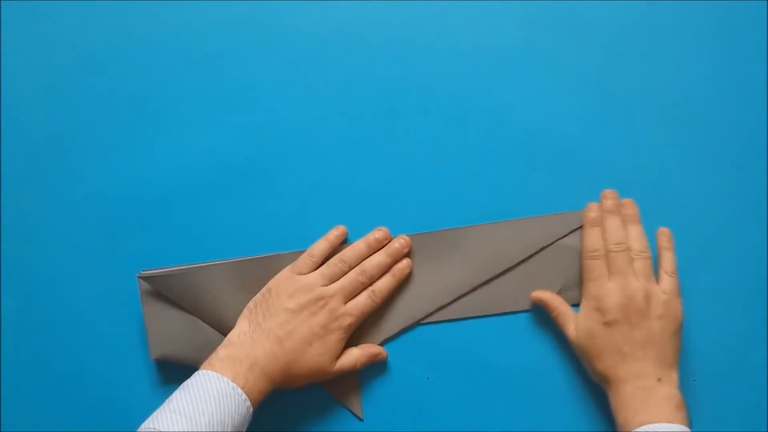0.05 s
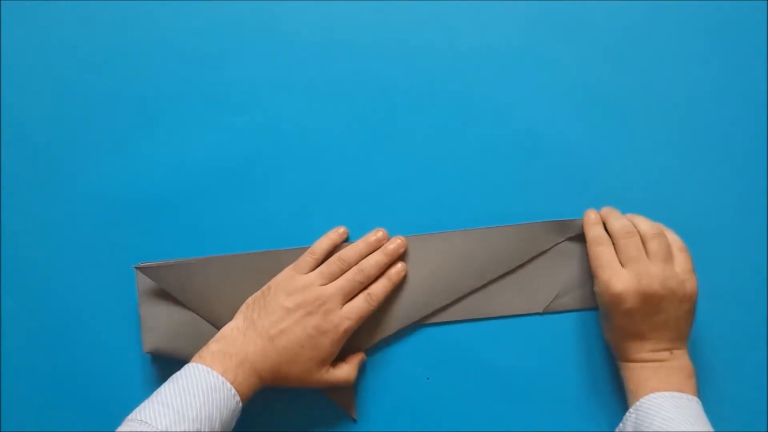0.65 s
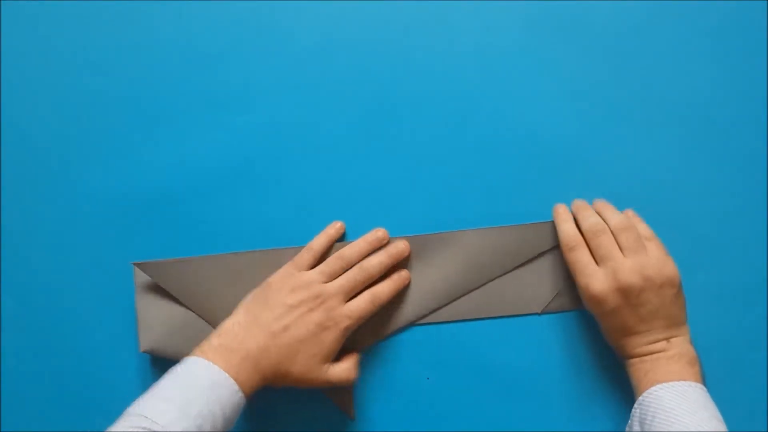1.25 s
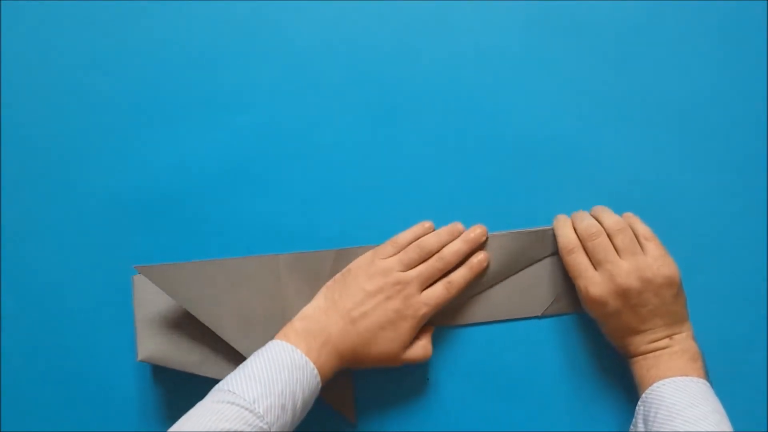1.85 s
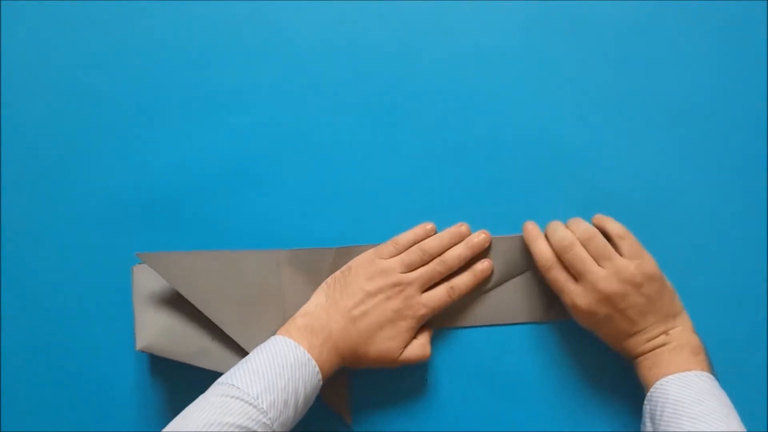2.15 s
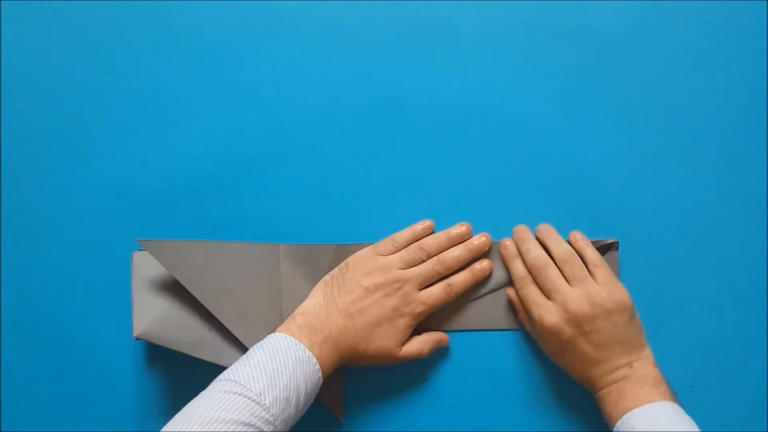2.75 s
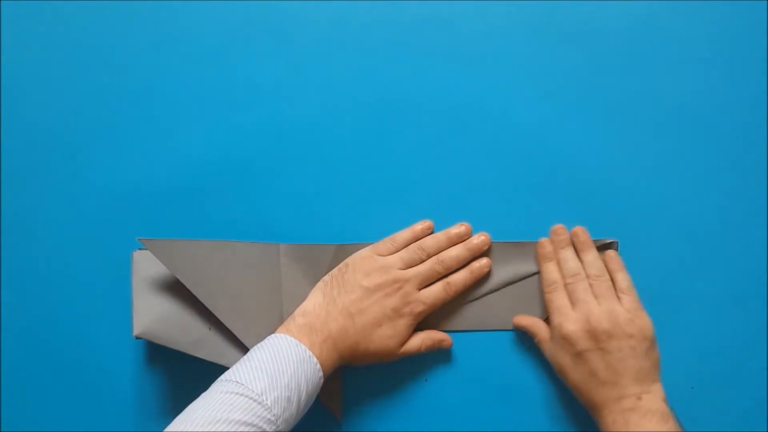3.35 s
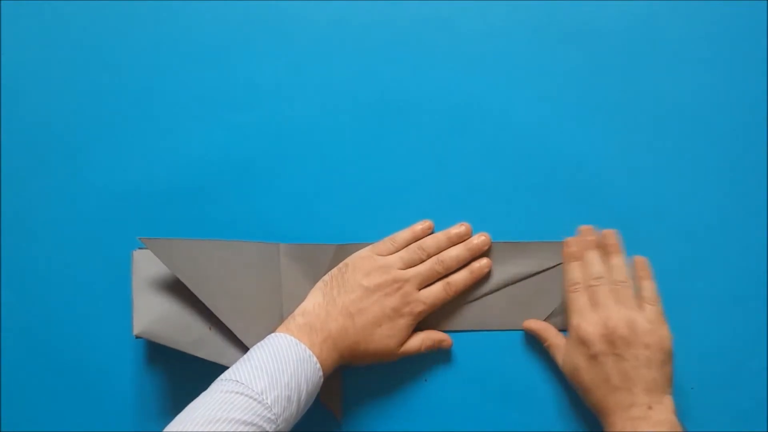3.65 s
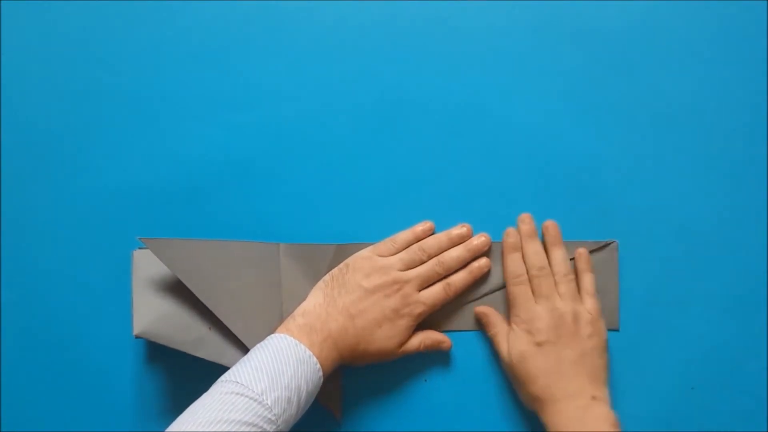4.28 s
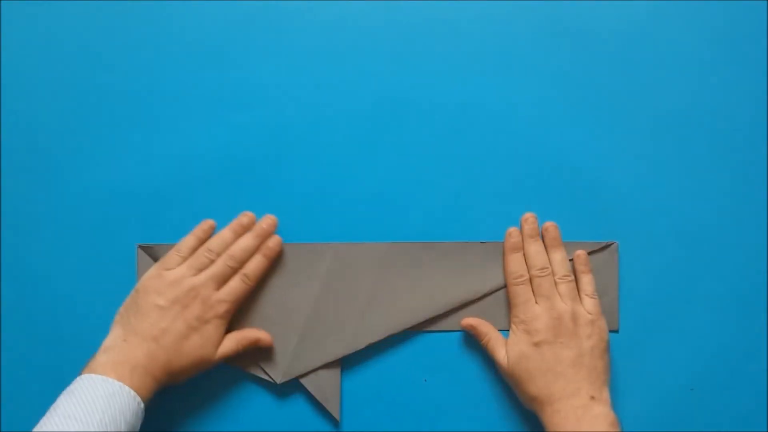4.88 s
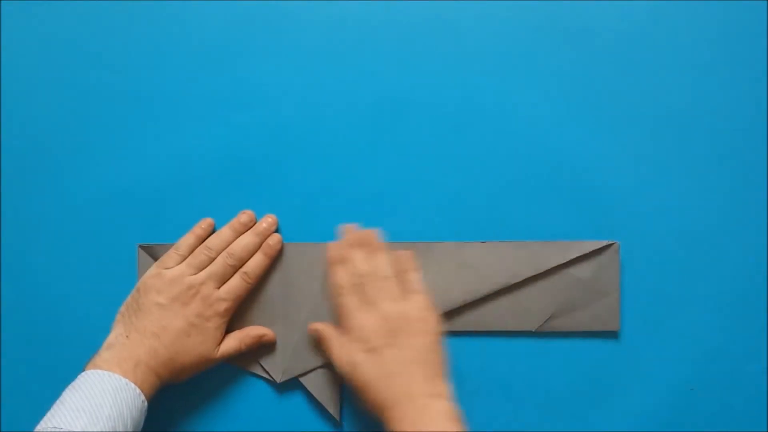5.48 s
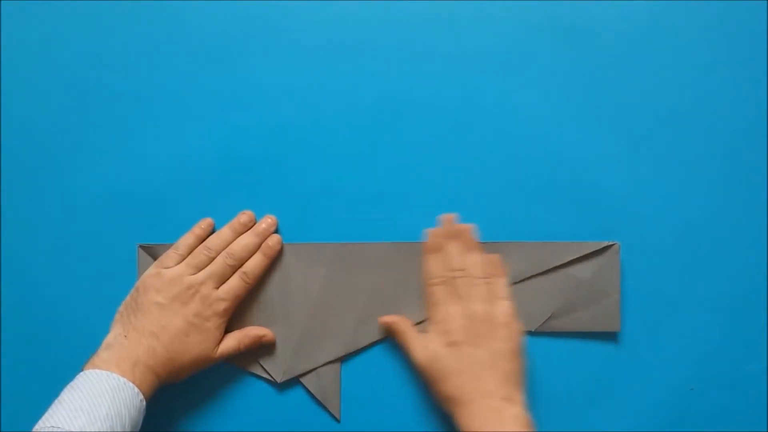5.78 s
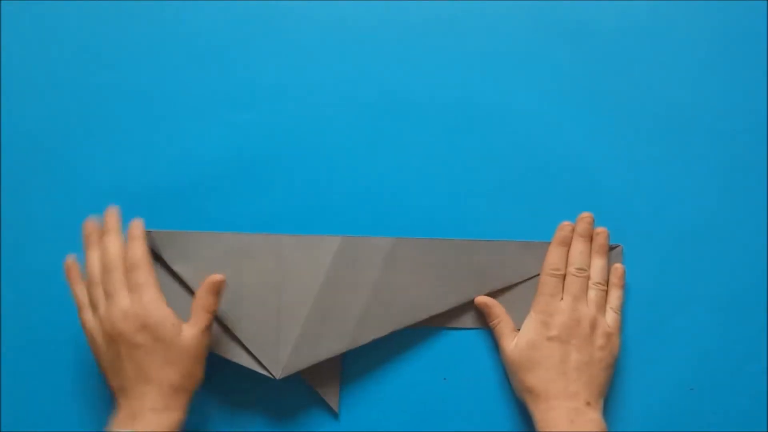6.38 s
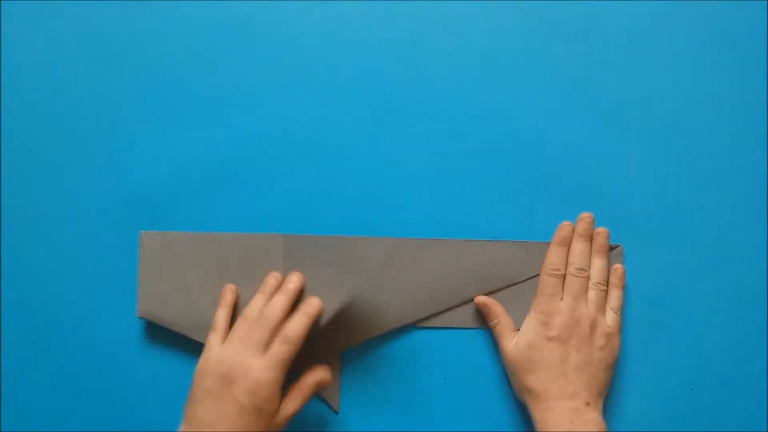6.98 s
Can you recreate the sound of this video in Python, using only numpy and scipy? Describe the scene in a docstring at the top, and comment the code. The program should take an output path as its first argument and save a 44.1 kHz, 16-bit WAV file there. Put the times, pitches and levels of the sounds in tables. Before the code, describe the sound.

Close, dry swishes of palms creasing thick paper on a table, dotted with light crinkles, taps and one sharp snap.

```python
"""Creasing heavy paper

Two hands crease a folded sheet on a tabletop in a small room. Sliding skin hisses, the sheet
rustles and the table rumbles. Folds snap and buckle, a hard-pressed fingertip judders in stick
and slip, edges catch, and one long stroke squeezes a hollow-sounding air pocket between the layers."""
import sys
import numpy as np
from scipy import signal
from scipy.fft import rfft, irfft, next_fast_len
from scipy.io import wavfile

SR = 44100
rng = np.random.default_rng(int(sys.argv[2]) if len(sys.argv) > 2 else 0)


def unload_wav(signal):
    """Save mono or channel-first audio to the path in sys.argv[1] as 16-bit WAV at rate SR, clipped to [-1, 1]."""
    wavfile.write(
        sys.argv[1],
        SR,
        np.round(np.clip(np.atleast_2d(signal).T, -1, 1) * 32767).astype(np.int16),
    )


N = 310081
TIME = np.arange(N) / SR


def from_db(db):
    """Decibels to gain."""
    return 10 ** (np.asarray(db) / 20)


def rms_one(x):
    """Scale to unit rms."""
    return x / np.sqrt(np.mean(x ** 2) + 1e-20)


def at_hz(points, hz):
    """Read a table on a log-frequency axis."""
    points_hz, value = np.transpose(points)
    return np.interp(np.log(np.maximum(hz, 1)), np.log(points_hz), value)


def butter(x, hz, kind, order=2):
    """Causal Butterworth filter."""
    return signal.sosfilt(signal.butter(order, hz, kind, fs=SR, output="sos"), x)


def resonance(x, hz, width_hz):
    """Two-pole resonance, peak gain 1."""
    r = np.exp(-np.pi * width_hz / SR)
    feedback = [1, -2 * r * np.cos(2 * np.pi * hz / SR), r * r]
    return signal.lfilter(np.array([1, 0, -1]) * (1 - r * r) / 2, feedback, x + 1e-18)


def drift(rate_hz):
    """Smooth random wander, rms 1."""
    size = next_fast_len(N)
    hz = np.arange(size // 2 + 1) * SR / size
    return rms_one(irfft(rfft(rng.standard_normal(N), size) / (1 + (hz / rate_hz) ** 2), size)[:N])


def add(track, start_s, sound):
    """Mix a sound in at a time."""
    i = max(round(start_s * SR), 0)
    track[..., i:i + sound.shape[-1]] += sound[..., :N - i]


def gate(start_s, length_s, fade_s):
    """A press: bites quickly, lets go four times slower."""
    bite = np.clip((TIME - start_s) / fade_s + .5, 0, 1)
    release = np.clip((start_s + length_s - TIME) / fade_s / 4 + .5, 0, 1)
    return bite * release


def grains(per_s, spread_db):
    """Random clicks of uneven size, rms 1."""
    sizes = from_db(spread_db * np.minimum(rng.exponential(1, N), 4)) * rng.choice([-1, 1], N)
    return rms_one(sizes * (rng.random(N) < per_s / SR))


# Stereo likeness. Each row: frequency in Hz, left-right correlation.
CORRELATION = [(50, 0.33), (130, 0.087), (300, 0.82), (630, 0.57), (1400, 0.058), (3000, 0.03)]

def colour(pair, spectrum):
    """Shape two independent noises into a partly correlated left and right, rms 1."""
    size = next_fast_len(N)
    hz = np.arange(size // 2 + 1) * SR / size
    mid, side = rfft(pair, size) * from_db(at_hz(spectrum, hz))
    alike = at_hz(CORRELATION, hz)
    left_right = np.sqrt(1 + alike) * mid + np.sqrt(1 - alike) * side * [[1], [-1]]
    return rms_one(irfft(left_right, size)[:, :N])


# Hand strokes. Each row: start in s, rise in s, slide in s, relative hiss level in dB,
# rustle offset in dB.
STROKES = [(-0.055, 0.17, 0.0063, -47, -8), (0.211, 0.022, 0.0054, -56, -1.5),
           (0.325, 0.05, 0.035, -56.5, -6), (0.461, 0.051, 0.0045, -56.5, -2),
           (0.568, 0.06, 0.11, -67, -0.5), (0.744, 0.1, 0.011, -63.5, -4.5),
           (0.925, 0.019, 0.041, -66.5, 3), (1.1, 0.066, 0.026, -52.5, -2), (1.081, 0.006, 0.049, -57.5, 3),
           (1.267, 0.074, 0.0045, -60.5, -5), (1.385, 0.13, 0.005, -53, -4), (1.496, 0.1, 0.11, -46, -6.5),
           (1.726, 0.076, 0.008, -44.5, -6.5), (1.847, 0.12, 0.11, -53.5, -0.5),
           (2.206, 0.0078, 0.0096, -58.5, 0), (2.235, 0.1, 0.034, -47, -7.5), (2.433, 0.028, 0.028, -55, 1),
           (2.477, 0.123, 0.0057, -57.5, -5), (2.707, 0.015, 0.02, -57.5, -4),
           (2.792, 0.082, 0.035, -54, -3.5), (2.812, 0.0055, 0.039, -61.5, 2),
           (2.963, 0.016, 0.0093, -47, 0), (3.022, 0.02, 0.0062, -50.5, -4), (3.32, 0.2, 0.058, -53, -5),
           (3.345, 0.016, 0.019, -48.5, -8.5), (3.593, 0.062, 0.0073, -58, -8),
           (3.835, 0.0023, 0.068, -46.5, -8), (4.065, 0.015, 0.027, -57, -7.5),
           (4.442, 0.018, 0.029, -55.5, -2.5), (4.57, 0.0061, 0.17, -52.5, -3.5),
           (4.595, 0.19, 0.21, -38.5, -9), (5.517, 0.13, 0.063, -44, -10), (5.784, 0.088, 0.17, -41, -8),
           (5.932, 0.19, 0.059, -40, -9), (6.306, 0.097, 0.042, -43.5, -4.5),
           (6.637, 0.086, 0.034, -70, -8.5), (6.825, 0.16, 0.005, -60.5, -8),
           (6.994, 0.035, 0.02, -52.5, -15)]

def strokes():
    """Each stroke brushes in, speeds up, slides and stops. Returns hiss and rustle envelopes in dB."""
    brush_db, brush_db_per_s, sag_db = -16.5, 333, 2.5
    stop_db_per_s, stop_ease_s = 309.5, 0.056
    hiss_power, rustle_power, t = 1e-11, 1e-12, TIME[::20]
    for start_s, rise_s, slide_s, db, loose_db in STROKES:
        age_s = t - start_s
        brush = from_db(brush_db + brush_db_per_s * np.minimum(age_s, 0))
        speed = np.sin(np.pi / 2 * np.clip(age_s / rise_s, 0, 1)) ** 2 + brush
        slid = np.clip((age_s - rise_s) / slide_s, 0, 1)
        stopping_s = np.maximum(age_s - rise_s - slide_s, 0)
        stop_db = stop_db_per_s * stopping_s ** 2 / (stopping_s + stop_ease_s)
        level = speed * from_db(db - sag_db * slid - stop_db)
        hiss_power += level ** 2
        rustle_power += (level * from_db(loose_db)) ** 2   # loose layers rustle more
    return [np.interp(TIME, t, 10 * np.log10(power)) for power in (hiss_power, rustle_power)]


def friction(spectrum, grain_db, rough_db):
    """Countless fibres slip under the skin, a few catch harder, and the grip wavers."""
    catches = np.array([grains(per_s=1500, spread_db=8) for _ in range(2)])
    fibres = rng.standard_normal((2, N)) + from_db(grain_db) * catches
    return colour(fibres, spectrum) * from_db(rough_db * drift(rate_hz=9))


def palm_echo(x, delay_s, gain):
    """An echo from the moving palm cuts shifting notches."""
    late_s = TIME - delay_s * from_db(1.73 * drift(rate_hz=4.1))
    return rms_one(x - gain * np.array([np.interp(late_s, TIME, side) for side in x]))


# Sheet modes. Each row: frequency in Hz, width in Hz, gain in dB.
SHEET_MODES = [(450, 120, 2.5), (750, 8.6, -2), (1255, 29, 3), (1400, 41, -0.5), (1511, 45, -3),
               (1645, 40, -5.5), (1830, 23, 4.5), (3104, 40, -2), (4270, 110, -2)]

def sheet_ring(x):
    """The folded sheet rings briefly in its modes."""
    return sum(from_db(db) * resonance(x, hz, width_hz) for hz, width_hz, db in SHEET_MODES)


# Friction spectra of skin, sheet and tabletop. Each row: frequency in Hz, relative density in dB.
HISS_SPECTRUM = [(1500, -19.5), (2400, -7.5), (3600, -5), (5200, -1), (6300, 1.5), (7100, 0.5), (8800, -4),
                 (12400, -13.5), (14300, -21.5)]
RUSTLE_SPECTRUM = [(300, -10), (500, -6.5), (900, -2.5), (1500, -0.5), (2400, -2.5), (4000, -4.5),
                   (7000, -29)]
TABLE_SPECTRUM = [(30, -21.5), (60, -10.5), (100, -6), (165, -2.5), (290, -8), (500, -4.5), (900, -28)]

def rubbing():
    """Skin hisses, brighter when fast; the sheet rustles; the table rumbles under the load."""
    hiss_db, rustle_db = strokes()
    hiss = friction(HISS_SPECTRUM, grain_db=-13.5, rough_db=1)
    hiss = from_db(hiss_db + 2) * reflections(hiss, decay_s=0.032)
    brighten_db = 0.2467 * np.maximum(hiss_db + 52.5, 0)
    hiss += (from_db(brighten_db) - 1) * butter(hiss, 10000, "high", order=1)

    rustle = friction(RUSTLE_SPECTRUM, grain_db=-7, rough_db=1.85)
    rustle = palm_echo(rustle, delay_s=0.001815, gain=0.59)
    rustle = from_db(rustle_db + 1) * rms_one(rustle + from_db(-3.5) * sheet_ring(rustle))

    rumble = friction(TABLE_SPECTRUM, grain_db=-12, rough_db=1.5)
    rumble += from_db(10) * resonance(rumble, hz=200, width_hz=4.4)
    sliding = np.clip((hiss_db + 85.5) / 20, 0, 1)   # resting hands leave the table still
    cushion = from_db(-10 * pocket_gate())   # trapped air keeps the load off the table
    return hiss + rustle + from_db(-35 + 0.5 * rustle_db) * sliding * cushion * rumble


# Quiet room. Each row: frequency in Hz, relative density in dB.
HUSH_SPECTRUM = [(25, 7), (65, -8.5), (190, 0), (280, -6.5), (2000, -16), (6000, -16.5), (14000, -22)]

def hush():
    """Faint, steady room noise."""
    return from_db(-76.5) * colour(rng.standard_normal((2, N)), HUSH_SPECTRUM)


# Folds snapping and fingers landing. Each row: start in s, relative peak in dB, spot pitch in Hz,
# low-pass in Hz, ring gain in dB.
SNAPS = [(0.402, -38.5, 435, 1400, 3), (0.9414, -41, 1800, 2300, 10), (0.9972, -43, 775, 1100, 1),
         (0.9988, -42, 1850, 2100, 14), (1.0849, -36.5, 790, 4200, 14), (1.1108, -35.5, 800, 2600, 10),
         (1.156, -42, 1550, 2000, 3), (1.1705, -37, 405, 1900, 1), (1.4243, -42, 432, 1150, 4),
         (1.9246, -31, 1200, 1700, 3), (1.951, -29, 1000, 1200, 4), (1.9633, -33, 278, 1200, 10),
         (2.033, -32.5, 1400, 1800, -5), (2.0525, -28.5, 746, 1100, 7), (2.1, -43, 1060, 1400, 2.5),
         (2.11, -42, 400, 1600, 4), (2.4777, -35, 1410, 2000, -4), (2.7188, -36, 483, 2280, 4),
         (2.9713, -29.5, 1370, 3860, 9), (3.4589, -14, 1400, 5200, 3.5), (3.8366, -36, 515, 750, 10),
         (4.078, -43.5, 530, 680, 12), (4.4518, -46.5, 1400, 1800, 14), (4.575, -33, 1120, 3770, -8),
         (4.719, -40, 450, 1610, -8), (5.049, -38, 480, 1960, -7.5), (6, -21, 1570, 2230, 7),
         (6.3475, -37, 340, 1900, 7), (6.4669, -30.5, 1400, 1700, 1)]

def snaps():
    """A stiff spot gives way in one pulse, rings briefly at its own pitch and shakes the sheet."""
    wall_delay_s, wall_db = 0.0094, -11
    out, click = np.zeros(N), signal.unit_impulse(SR // 8)
    for start_s, db, hz, top_hz, ring_db in SNAPS:
        pulse = butter(click, 0.61 * hz, "high", order=3)
        pulse = butter(pulse, top_hz, "low", order=4)
        pulse += from_db(ring_db) * resonance(pulse, hz, width_hz=0.14 * hz)
        pulse /= np.abs(pulse).max()
        add(out, start_s, from_db(db - 0.5) * (pulse + from_db(-3) * sheet_ring(pulse)))
    return out + from_db(wall_db) * np.interp(TIME - wall_delay_s, TIME, out)


# Fingertip judders. Each row: start in s, length in s, relative level in dB, resonance in Hz,
# nominal slips per s.
JUDDERS = [(0.688, 0.2, -66.5, 480, 62), (2.972, 0.04, -47, 1320, 195), (3.356, 0.021, -51, 390, 130),
           (3.858, 0.12, -56.5, 482, 45), (4.11, 0.028, -65, 540, 70), (4.149, 0.014, -65.5, 330, 150)]

def judders():
    """The fingertip sticks and slips unevenly; each slip knocks the paper, weaker as the press eases."""
    out = np.zeros(N)
    pace = from_db(5.6 * drift(rate_hz=46))
    force = from_db(2 * drift(rate_hz=71))
    for start_s, length_s, db, hz, per_s in JUDDERS:
        slip_count = np.floor(np.cumsum(per_s * pace) / SR)
        slips = np.diff(slip_count, prepend=0) * force
        knocks = resonance(resonance(slips, hz, width_hz=160), hz, width_hz=280)
        easing = 1 - np.clip((TIME - start_s) / length_s, 0, 1) / 2
        out += from_db(db + 2) * gate(start_s, length_s, fade_s=0.00787) * easing * rms_one(knocks)
    return out


# Layers crumpling. Each row: start in s, length in s, relative level in dB, low-pass in Hz.
CRUMPLES = [(1.151, 0.028, -54.5, 1800), (1.79, 0.048, -48, 1090), (1.95, 0.157, -54.5, 1500),
            (6.321, 0.05, -58, 1500), (6.475, 0.026, -53, 1490)]

def crumples():
    """Stacked layers collapse in a run of small pops, muffled by the hand."""
    out = np.zeros(N)
    pops = butter(grains(per_s=400, spread_db=0.6), 246, "high")
    for start_s, length_s, db, top_hz in CRUMPLES:
        muffled = rms_one(butter(pops, top_hz, "low", order=3))
        out += from_db(db + 1.5) * gate(start_s, length_s, fade_s=0.0044) * muffled
    return out


# Brief catches. Each row: start in s, level in dB.
SCRATCHES = [(1.78, -44), (2.316, -46), (3.036, -45.5), (3.167, -60), (3.354, -49.5), (3.838, -48.5),
             (6.55, -48)]

def scratches(decay_s=0.019):
    """A nail or paper edge catches and lets go in a crisp spray of clicks."""
    clicks = np.array([grains(per_s=2500, spread_db=3) for _ in range(2)])
    force = np.zeros(N)
    for start_s, db in SCRATCHES:
        add(force, start_s, from_db(db) * np.exp(-TIME[:SR // 8] / decay_s))
    return force * colour(clicks, HISS_SPECTRUM)


# Air pocket between the layers. Each row: time in s, resonance in Hz, level in dB.
POCKET_GLIDE = [(4.715, 460, -59), (4.775, 235, -59), (4.86, 120, -61), (4.925, 473, -58),
                (4.955, 230, -68), (5.039, 169, -62.5)]

def air_pocket():
    """A hollow band of noise sinks, rises and sinks again as the palm passes."""
    times_s, _, db = np.transpose(POCKET_GLIDE)
    band = pocket_band(rng.standard_normal(N), ratio=1, width_hz=160)
    band = rms_one(butter(band, 110, "high"))
    return from_db(np.interp(TIME, times_s, db)) * pocket_gate() * band


def pocket_band(x, ratio, width_hz):
    """Band-pass that follows a multiple of the pocket's gliding resonance."""
    times_s, hz, _ = np.transpose(POCKET_GLIDE)
    centre_hz = ratio * np.exp(np.interp(TIME, times_s, np.log(hz)))
    carrier = np.exp(2j * np.pi * np.cumsum(centre_hz) / SR)
    low_pass = signal.butter(2, width_hz / 2, fs=SR, output="sos")
    return 2 * np.real(signal.sosfiltfilt(low_pass, x / carrier) * carrier)


def pocket_gate():
    """1 while the palm rides on the air pocket, fading to 0 outside."""
    start_s, end_s = POCKET_GLIDE[0][0], POCKET_GLIDE[-1][0]
    return gate(start_s, end_s - start_s, fade_s=0.011)


# Echo colour. Each row: frequency in Hz, relative level in dB.
ECHO_SPECTRUM = [(200, -4.5), (1500, -5), (4500, 3.5), (9000, 4.5), (14000, -8.5)]

def reflections(x, decay_s):
    """Hands and tabletop scatter a brief burst of echoes, rippling the spectrum; rms 1."""
    t = TIME[:SR // 25]
    echoes = colour(rng.standard_normal((2, N)), ECHO_SPECTRUM)[:, :len(t)] * np.exp(-t / decay_s)
    echoes /= np.sqrt(np.sum(echoes ** 2) / 2)
    return rms_one(x + from_db(-12) * signal.fftconvolve(x, echoes, axes=1)[:, :N])


# Room decay. Each row: frequency in Hz, time to fall 60 dB in s.
ROOM_T60 = [(100, 0.78), (500, 0.23), (5000, 0.32), (14000, 0.046)]

def room(x, early_db, early_s, gap_s):
    """Nearby surfaces answer first, then a diffuse tail dies away band by band."""
    t, edges_hz = TIME[:SR // 2], np.geomspace(22, 17000, 25)
    spectrum = rfft(colour(rng.standard_normal((2, N)), ECHO_SPECTRUM)[:, :len(t)])
    hz = np.arange(len(t) // 2 + 1) * SR / len(t)
    band, tail = np.digitize(hz, edges_hz), 0
    for k, edge_hz in enumerate(edges_hz):
        tail += irfft(spectrum * (band == k), len(t)) * from_db(-60 * t / at_hz(ROOM_T60, edge_hz))
    tail *= np.clip(t / gap_s - .5, 0, 1)
    tail *= 1 + from_db(early_db) * np.exp(-t / early_s)
    tail /= np.sqrt(np.sum(tail ** 2) / 2)
    return x + signal.fftconvolve(x[None], tail, axes=1)[:, :N]


def scene():
    """Rubbing and scratches up close, knocks and air pocket in the room, hush beneath."""
    rub = rubbing()
    rub -= pocket_gate() * pocket_band(rub, ratio=2.46, width_hz=136)   # the pocket swallows a band
    paper = snaps() + crumples() + judders() + air_pocket()
    paper = room(paper, early_db=-6, early_s=0.025, gap_s=0.0059)
    return rub + paper + hush() + scratches()


# Microphone balance. Each row: frequency in Hz, left minus right in dB.
MIC_BALANCE = [(1200, -0.24), (3000, -1), (5000, 2), (6800, 0), (9000, -7), (14000, -8)]

def record(dry):
    """The left microphone is duller in the top octave; the highest treble is cut."""
    cutoff_hz = 14600
    size = next_fast_len(N + SR // 8)
    hz = np.arange(size // 2 + 1) * SR / size
    tilt = from_db(at_hz(MIC_BALANCE, hz) * np.array([[.5], [-.5]]))
    low_pass = 1 / np.sqrt(1 + (hz / cutoff_hz) ** 300)
    return irfft(rfft(dry, size) * tilt * low_pass, size)[:, :N]


dry = scene()
out = record(dry)
unload_wav(out)
```